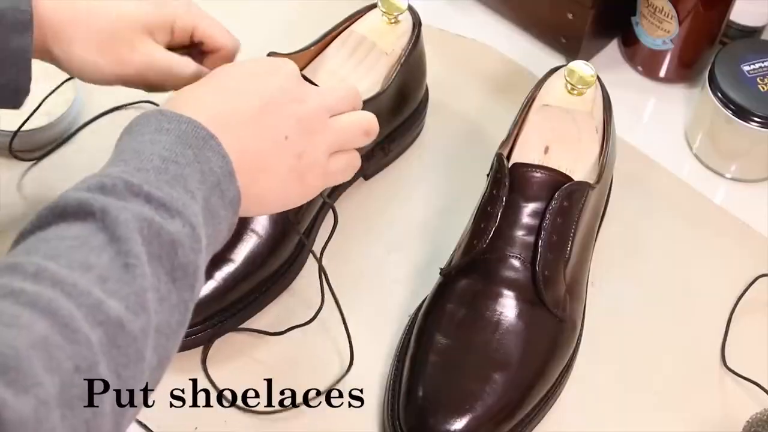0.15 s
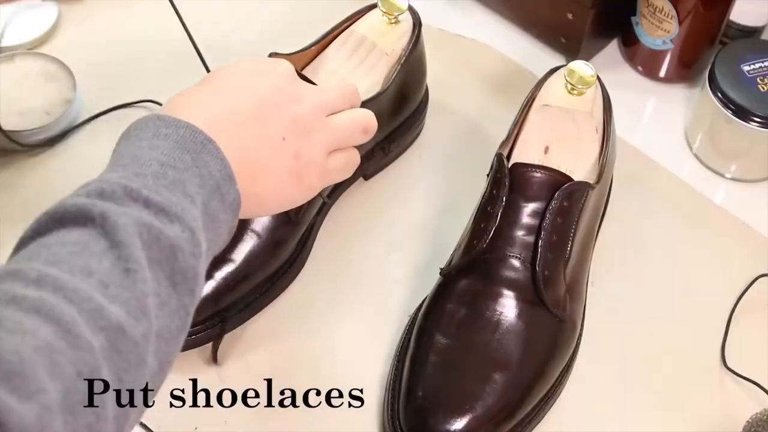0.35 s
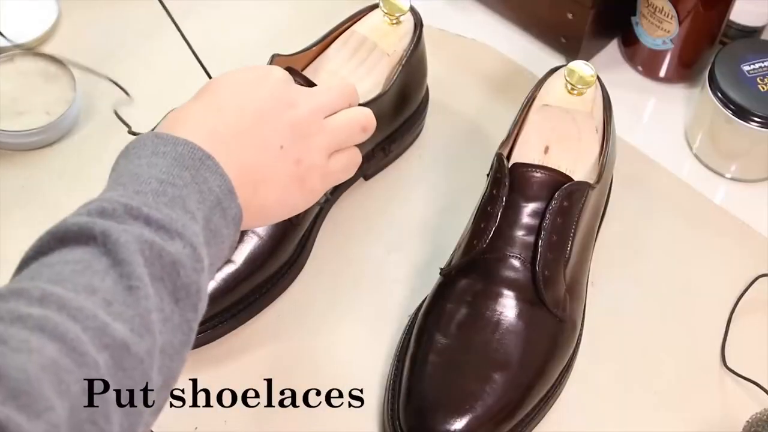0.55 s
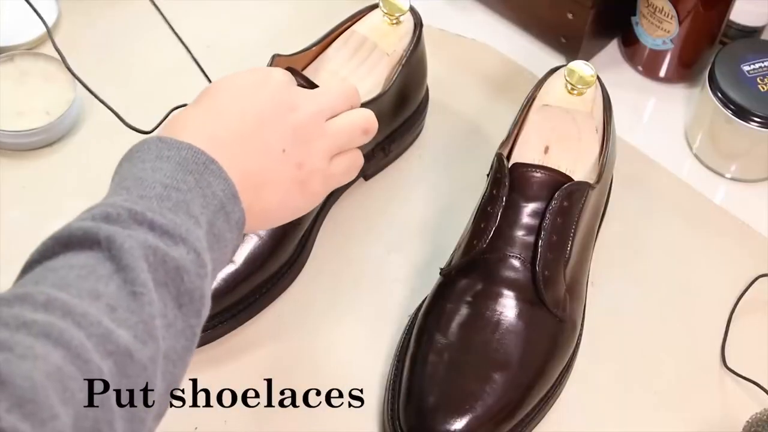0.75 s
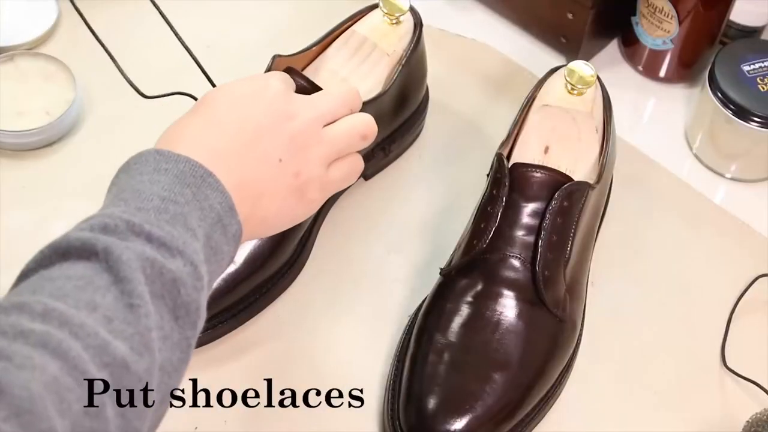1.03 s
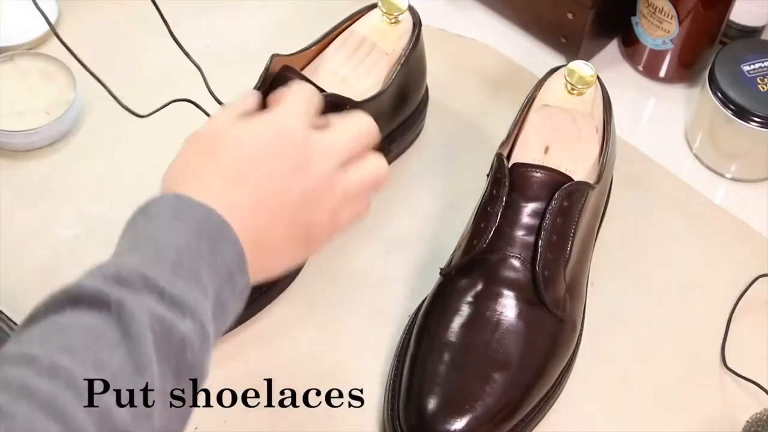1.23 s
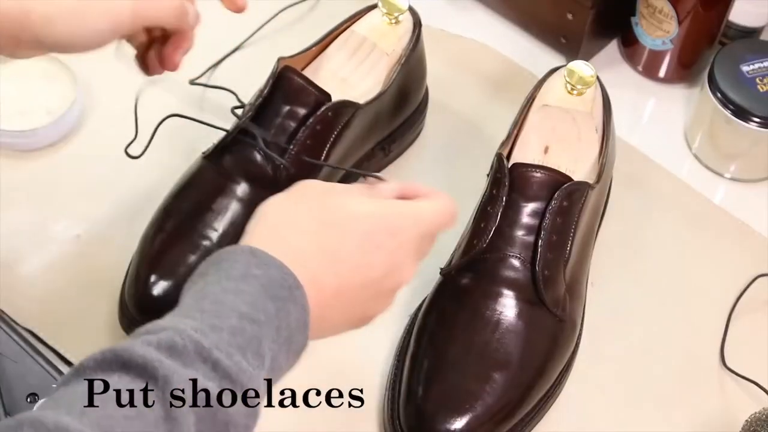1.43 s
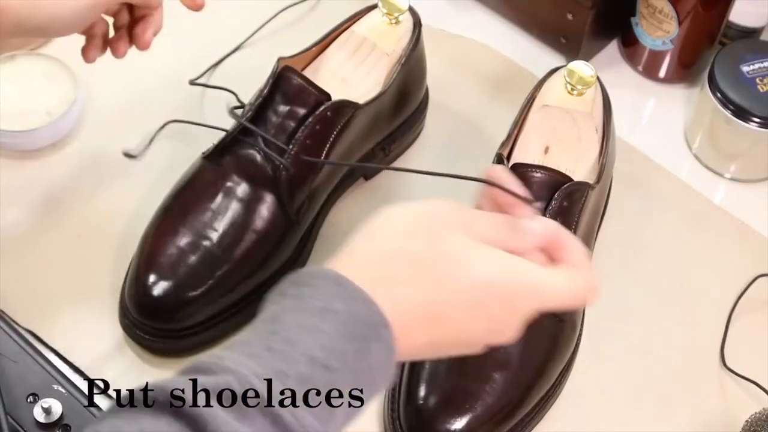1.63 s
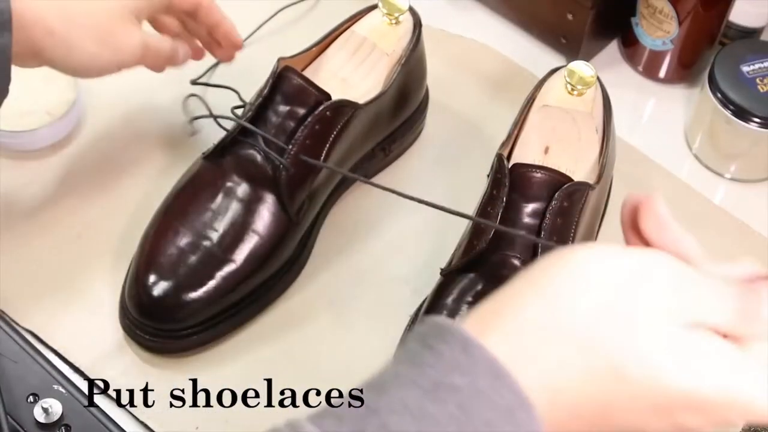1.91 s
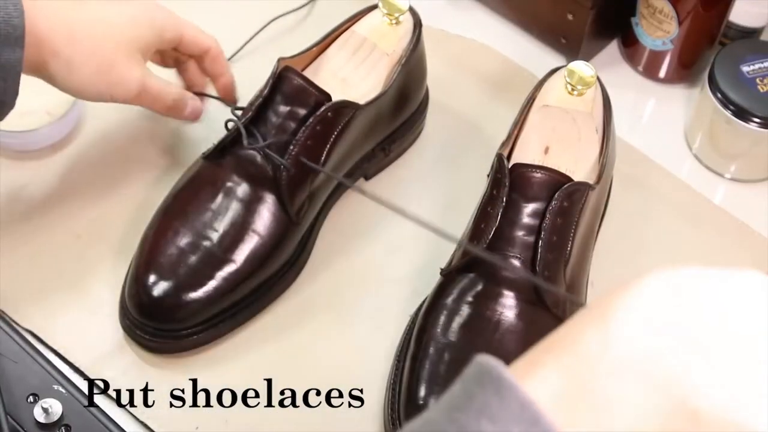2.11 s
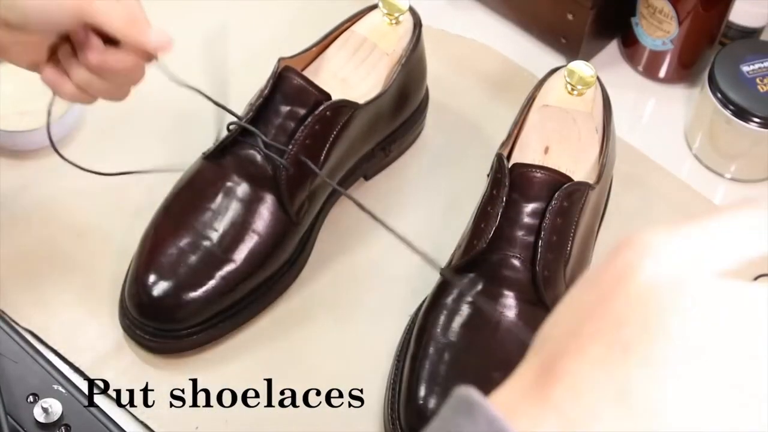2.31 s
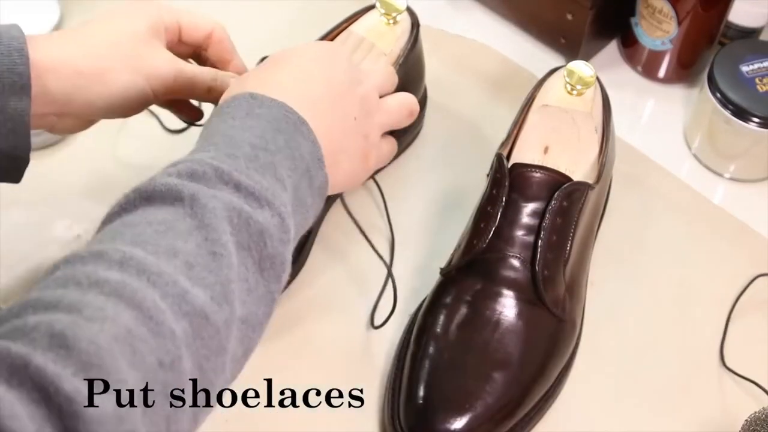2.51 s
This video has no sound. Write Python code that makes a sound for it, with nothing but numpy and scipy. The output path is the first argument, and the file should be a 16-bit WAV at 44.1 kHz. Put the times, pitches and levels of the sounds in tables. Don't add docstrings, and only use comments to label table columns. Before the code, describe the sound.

A shoelace drawn through leather eyelets, close and dry in a quiet small room. A tick at 0.1 s, then a bright hissing, squeaky-rubbing pull from 0.2 to 1.0 s, with knocks near 0.8 and a short hollow moan at 0.9. A small tick at 1.2, a duller, woodier scraping pull from 1.4 to 2.3 with ticks at 1.85 and 2.1, then finger rustle and light clicks until 2.6.

```python
import sys
import numpy as np
from scipy import signal
from scipy.fft import rfft, irfft
from scipy.io import wavfile
from scipy.ndimage import uniform_filter1d

SR = 44100
rng = np.random.default_rng(int(sys.argv[2]) if len(sys.argv) > 2 else 0)


def convert_level_to_amplitude(level_db):
    exponent = np.asarray(level_db, float) / 20
    return 10 ** exponent


def wav_record(signal):
    frames = np.transpose(np.atleast_2d(signal))
    bounded = np.clip(frames, -1, 1)
    quanta = np.round(bounded * 32767).astype(np.int16)
    wavfile.write(sys.argv[1], SR, quanta)


N = 116865


def evened(x):
    return x / np.sqrt(np.mean(x ** 2) + 1e-20)


def read(points, hz):
    f, value = np.transpose(points)
    return np.interp(np.log(hz + 1), np.log(f + 1), value)


def level_over_time(points, t):
    return convert_level_to_amplitude(np.interp(t, *np.transpose(points), left=-120, right=-120))


def smooth_patches(shape, first, second):
    noise = rng.standard_normal(shape)
    return evened(uniform_filter1d(uniform_filter1d(noise, first, 0), second, 1))


def modes(table, hz):
    response = 0
    for k, (f, width, db) in enumerate(table):
        response = response + convert_level_to_amplitude(db) * 1j * (hz / f) / (1 + 2j * (hz - f) / width) * (-1) ** k
    return response


# pitch_hz, density_db (per Hz)
ROOM_TONE = [(25, -26), (70, -11), (200, -6), (420, -8), (1200, -12), (2600, -26), (5000, -30),
             (15500, -36)]
ROOM_TONE_DB = -51


def room_tone():
    frames, hz = N // 256 + 5, np.fft.rfftfreq(1024, 1 / SR)
    a, b, c, d = rng.standard_normal((4, 513, frames))
    patches = smooth_patches((513, frames), 10, 12)
    left = a + 1j * b
    right = .4 * left + .9 * (c + 1j * d)
    colour = convert_level_to_amplitude(read(ROOM_TONE, hz)[:, None] + 1.5 * patches)
    z = np.array([left * convert_level_to_amplitude(2.5), right * convert_level_to_amplitude(-2.5)]) * colour
    return convert_level_to_amplitude(ROOM_TONE_DB + 6.0) * evened(signal.istft(z, nperseg=1024, noverlap=768)[1][:, :N])


# pitch_hz, decay_s
ROOM_DECAY = [(200, 0.31), (2000, 0.15), (10000, 0.085)]


def room(x):
    taps = np.zeros((2, SR // 2))
    at = np.arange(80, SR // 2 - 20, 20) + rng.integers(0, 20, (2, (SR // 2 - 81) // 20))
    np.put_along_axis(taps, at, rng.choice([-1., 1.], at.shape), 1)
    hz, t, z = signal.stft(taps, SR, nperseg=256)
    decay = convert_level_to_amplitude(-60 * t / read(ROOM_DECAY, hz)[:, None])
    tail = signal.istft(z * decay, SR, nperseg=256)[1]
    return signal.fftconvolve(x, tail / np.linalg.norm(tail[0]), axes=1)[:, :N]


# time_s, level_db
MOAN = [(.89, -66), (.905, -20.5), (.93, -20.5), (.958, -25.5), (.975, -30.5), (1.04, -46), (1.1, -60)]
MOAN_HZ, MOAN_SAG_HZ_PER_S, MOAN_ROUGH = 522.6, 60, .6


def moan():
    t = np.arange(N) / SR
    phase_waver, level_waver = (evened(uniform_filter1d(v, 500)) for v in rng.standard_normal((2, N)))
    since = t - MOAN[0][0]
    turn = 2 * np.pi * (MOAN_HZ - MOAN_SAG_HZ_PER_S * since / 2) * since + MOAN_ROUGH * phase_waver
    level = level_over_time(MOAN, t) * (1 + MOAN_ROUGH * level_waver)
    return np.array([np.sin(turn) * convert_level_to_amplitude(1), np.sin(turn + 0.84)]) * level


NEAR_LEFT_DB = 4
# time_s, level_db
RELEASES = [(0.368, -13), (.437, -5), (.466, -12), (.482, -14), (.519, -4), (0.62, -19), (0.699, -15)]
RELEASE_HZ, RELEASE_S = 1373, 0.0034


def releases():
    t, burst = np.arange(N) / SR, 0
    for s, db in RELEASES:
        hz = RELEASE_HZ * rng.uniform(.97, 1.03)
        burst = burst + convert_level_to_amplitude(db) * np.exp(-((t - s) / RELEASE_S) ** 2 + 2j * np.pi * hz * (t - s))
    return np.array([burst.imag * convert_level_to_amplitude(NEAR_LEFT_DB), -burst.real * convert_level_to_amplitude(-NEAR_LEFT_DB)])


# start_s, ring_db, ring_hz, crack_db, crack_hz
TICKS = [(.1233, -13, 1590, -8, 4150), (.766, -2, 1230, -27, 3530), (.7965, -4, 1360, -4, 4060),
         (.8085, -3, 1330, -8, 6500), (.9, -9.5, 1050, -7, 3900), (1.098, -32, 1250, -48, 2100),
         (1.339, -39, 900, -37, 2640), (1.2327, -6.5, 1000, -22.5, 13200), (1.233, -28, 2270, -23.5, 5860),
         (1.8467, -5, 1370, -13, 2650), (2.095, -4, 1600, -10, 2960), (2.151, -35, 2400, -14.5, 3800),
         (2.161, -33, 1360, -27.5, 4300), (2.3, -23, 2040, -19.5, 8400), (2.3006, -63, 2030, -25, 12800),
         (2.3697, -9, 2130, -7.5, 4740), (2.4668, -13.5, 2390, -21, 2520), (2.469, -20.5, 1570, -41, 2920),
         (2.519, -52, 1630, -29.5, 12500), (2.594, -27.5, 1250, -25, 8430)]
# multiple of crack_hz, level_db
CRACK_MODES = [(.87, 0), (1.17, -3), (1.8, -6), (2.4, -6)]
RING_T60, CRACK_T60 = 0.0073, .005
GRIT_DB = -7


def tick_ring(t, db, hz):
    ring = 0
    for multiple, over_db in [(.7, -12.5), (1, 3), (1.45, -4.5)]:
        fade = convert_level_to_amplitude(db + over_db - 60 * t * (multiple * hz / 1300) ** .5 / RING_T60)
        ring = ring + fade * np.sin(2 * np.pi * multiple * hz * t)
    return ring * np.minimum(t / 0.00055, 1)


def tick_crack(t, db, hz, white):
    late = t - np.array([[0], [1 / 4]]) / hz
    snap = 0
    for multiple, over_db in CRACK_MODES:
        if multiple * hz < 16500:
            snap = snap + convert_level_to_amplitude(over_db) * np.sin(2 * np.pi * multiple * hz * late)
    band = signal.butter(2, [hz * .75, min(hz * 1.3, 16500)], "band", fs=SR, output="sos")
    grit = convert_level_to_amplitude(GRIT_DB) * evened(signal.sosfilt(band, white))
    return convert_level_to_amplitude(db - 60 * t / CRACK_T60) * (snap + grit) * np.minimum(t * hz * 2, 1)


def ticks():
    out, t = np.zeros((2, N + 2000)), np.arange(2000) / SR
    for s, ring_db, ring_hz, crack_db, crack_hz in TICKS:
        crack = tick_crack(t, crack_db, crack_hz, rng.standard_normal((2, 2000)))
        tick = tick_ring(t, ring_db, ring_hz) + crack
        out[:, round(s * SR):][:, :2000] += tick * convert_level_to_amplitude([[NEAR_LEFT_DB], [-NEAR_LEFT_DB]])
    return out[:, :N]


def jerks(per_s, spread_db):
    size = convert_level_to_amplitude(spread_db * np.minimum(rng.exponential(1, N), 3.5)) * (rng.random(N) < per_s / SR)
    return evened(size * rng.standard_normal((2, N)))


# pitch_hz, level_db
SIDES = [
    [(60, 11), (180, 1.5), (550, 9), (1650, 6.5), (4970, -0.5), (15000, 14.5)],
    [(60, 1), (240, 0), (950, 7.5), (3770, -4), (15000, 1.5)],
]
# pitch_hz, phase_rad
LEADS = [(300, -1.88), (600, -1.26), (1400, -1.35), (3000, -1.76), (7000, -1.33)]
# pitch_hz, likeness (0 to 1)
ALIKE = [(100, .6), (600, .9), (1400, .78), (4000, .55), (10000, .3)]


def pair(drive, colour, hz, sides):
    a, b = rfft(drive, axis=1)
    alike, half = np.clip(read(ALIKE, hz), 0, 1), convert_level_to_amplitude(read(sides, hz) / 2)
    right = alike * a * np.exp(-1j * read(LEADS, hz)) + np.sqrt(1 - alike ** 2) * b
    colour = colour / np.sqrt(np.mean(abs(colour) ** 2))
    return irfft(np.array([a * half, right / half]) * colour, N)


def wander(x):
    for size, wide, long in [(256, 5, 16), (1024, 2, 9)]:
        z = signal.stft(x, nperseg=size)[2]
        patches = smooth_patches(z.shape[1:], wide, long)
        x = signal.istft(z * convert_level_to_amplitude(1.1 * patches), nperseg=size)[1][:, :N]
    return x


BITE_RISE_S, BITE_FALL_S = 0.0061, 0.0039


def bite_shape(t, start, length):
    rise = np.clip((t - start) / BITE_RISE_S, 0, 1)
    return rise * np.clip(1 - (t - start - length) / BITE_FALL_S, 0, 1) ** 2


# pitch_hz, density_db (per Hz)
HISS = [
    [(1060, -63), (1800, 0.5), (3090, -5), (3670, -2.5), (5650, -11), (7400, -11.5), (15500, -31.5)],
    [(1060, -64), (1800, -5.5), (3150, -10.5), (4120, -3.5), (6350, -11), (9190, -19), (15500, -22)],
    [(1060, -25), (1800, -17), (4050, -16), (5310, -22), (6180, -17.5), (7890, -20.5), (15500, -9.5)],
]
# pitch_hz, width_hz, level_db
EYELET = [
    [(2190, 13, 2.5), (2900, 180, 9), (3470, 1060, 5.5), (5140, 100, 1), (6870, 120, 1), (8850, 140, 6)],
    [(2280, 600, -7.5), (3706, 240, 2.5), (3710, 166, 0), (5260, 110, -6), (6000, 270, -5),
     (7500, 140, -22)],
]
# pitch_hz, width_hz, level_db
UPPER = [
    [(927, 155, -8), (1309, 170, 3.5), (1360, 121, 5), (1580, 113, -4)],
    [(1000, 163, -2), (1268, 217, -1.5), (1378, 118, 3), (1584, 145, -2.5)],
]
# pitch_hz, width_hz, level_db
BODY = [
    [(326, 109, 1.5), (505, 140, 4), (710, 53, 7.5)],
    [(240.2, 19, -10.5), (339, 98, -9), (490, 82, -3), (566, 50.7, 2.5), (706, 50, -2.5)],
]
# pitch_hz, width_hz, level_db
THUMP = [(75, 10.5, 2.3), (148.4, 29.5, 3)]
# upper_db, body_db
STEADY = [
    (-3, -7),
    (2, 5),
    (-9.5, -13.5),
]
TREBLE_DB = [
    -6,
    -17,
    -36,
]
LEVELS = [
    2.67,
    1.69,
    3.02,
]
# time_s, level_db
RIDGE = [(.1, -10), (.4, -20), (.68, -1.5), (.9, -9), (1.4, -12), (1.55, -10), (1.66, -8), (1.78, -4),
         (1.85, -12), (2.12, -12), (2.18, -10.5), (2.3, -19)]
# start_s, length_s, hiss_db
SCRAPES = [(0.767, 0.0081, -22), (.897, 0.028, -31.5), (1.345, .008, -51), (1.406, .045, -43),
           (1.691, 0.022, -27), (1.94, 0.034, -34.5), (2.092, 0.031, -25.5), (2.33, 0.008, -25),
           (2.35, 0.0045, -35), (2.4, .006, -32), (2.425, 0.0034, -39), (2.477, .003, -42)]
SLIPS_PER_S, SLIP_DB, BITES_PER_S, BITE_DB = 12000, 0.5, 2500, 2
FLICKER_DB, FLICKER_S = 1.2, .008
BITE_HISS_DB, THUMP_DB = -15, -32
TREBLE_HZ, BRIGHTEN = 6610, 0.56


def pull(strokes, bites, scrapes, which):
    t, hz, shoe = np.arange(N) / SR, np.fft.rfftfreq(N, 1 / SR), min(which, 1)
    slide_gain, upper_gain, body_gain = convert_level_to_amplitude(LEVELS)

    slide = sum(level_over_time(stroke, t) for stroke in strokes)
    steady_upper_db, steady_body_db = STEADY[which]
    upper_power = (slide * convert_level_to_amplitude(steady_upper_db)) ** 2
    body_power = (slide * convert_level_to_amplitude(steady_body_db)) ** 2
    for start, length, upper_db, body_db in bites:
        power = bite_shape(t, start, length) ** 2
        upper_power += power * convert_level_to_amplitude(upper_db) ** 2
        body_power += power * convert_level_to_amplitude(body_db) ** 2
    upper, body = np.sqrt(upper_power), np.sqrt(body_power)
    snags = sum((bite_shape(t, start, length) * convert_level_to_amplitude(db)) ** 2 for start, length, db in scrapes)
    rub = np.sqrt(slide ** 2 + snags + convert_level_to_amplitude(BITE_HISS_DB) ** 2 * (upper_power + body_power))

    unsteady = uniform_filter1d(rng.standard_normal(N), round(FLICKER_S * SR))
    flicker = convert_level_to_amplitude(FLICKER_DB * evened(unsteady))
    grip = jerks(BITES_PER_S, BITE_DB) * flicker
    deep = jerks(BITES_PER_S, BITE_DB) * flicker
    slips = jerks(SLIPS_PER_S, SLIP_DB) * flicker * rub * slide_gain
    bright_slips = slips * convert_level_to_amplitude(TREBLE_DB[which]) * (rub / rub.max()) ** BRIGHTEN

    treble = 1 / (1 + (TREBLE_HZ / (hz + 1)) ** 4)
    weave = convert_level_to_amplitude(read(HISS[which], hz)) * np.minimum(hz / 1500, 1) ** 1.1
    weave = weave * (1 + modes(EYELET[shoe], hz))
    ridge = convert_level_to_amplitude(np.interp(t, *np.transpose(RIDGE)))
    layers = [(slips, weave * (1 - treble)),
              (bright_slips, weave * treble),
              (grip * upper * upper_gain, modes(UPPER[shoe], hz)),
              ((.5 * grip + 0.46 * deep) * body * body_gain, modes(BODY[shoe], hz)),
              (deep[::-1] * body * body_gain * ridge, modes(BODY[shoe][-1:], hz)),
              (deep * rub ** 0.54 * convert_level_to_amplitude(THUMP_DB), modes(THUMP, hz))]
    return wander(sum(pair(drive, colour, hz, SIDES[which % 2]) for drive, colour in layers))


# time_s, level_db
FINGERS_START = [(2.215, -50), (2.235, -31.5), (2.268, -29.5), (2.278, -44)]
# time_s, level_db
FINGERS = [(2.284, -39.5), (2.315, -31), (2.35, -26), (2.375, -30), (2.42, -35.5), (2.5, -48),
           (2.58, -46.5), (2.598, -42), (2.603, -87)]
# start_s, length_s, upper_db, body_db
FINGER_BITES = [(2.288, 0.012, -50, -26.5), (2.312, 0.0384, -38, -24.5), (2.353, 0.02, -28.5, -30.5),
                (2.611, 0.028, -47, -39)]


def fingers():
    return pull([FINGERS_START, FINGERS], FINGER_BITES, SCRAPES[7:], which=2)


# time_s, level_db
SHIFT = [(1.225, -41), (1.24, -43), (1.275, -39), (1.31, -85)]
# time_s, level_db
SECOND_PULL = [(1.364, -52), (1.392, -32.5), (1.535, -33.5), (1.57, -30.5), (1.83, -32), (1.95, -28),
               (2.03, -29.5), (2.14, -34), (2.262, -35.5), (2.286, -48)]
# start_s, length_s, upper_db, body_db
SECOND_BITES = [(1.235, 0.049, -35, -35.5), (1.332, 0.011, -42, -41), (1.376, 0.079, -27.5, -24),
                (1.418, 0.059, -27, -22), (1.486, 0.038, -27, -25), (1.553, 0.035, -30.5, -27),
                (1.584, 0.052, -28, -25), (1.636, 0.01, -29, -35), (1.662, 0.051, -25, -47),
                (1.7, 0.025, -27, -31), (1.74, 0.015, -43, -38), (1.846, 0.014, -19.5, -22.5),
                (1.933, 0.038, -24.5, -24), (2.054, 0.022, -49, -20.5), (2.082, 0.024, -23, -16.5),
                (2.11, 0.01, -34, -43), (2.159, 0.033, -35, -23.5), (2.195, 0.0091, -45, -26),
                (2.222, 0.016, -49, -23), (2.25, 0.012, -30, -25.5)]


def second_pull():
    return pull([SHIFT, SECOND_PULL], SECOND_BITES, SCRAPES[2:7], which=1)


# time_s, level_db
FIRST_PULL = [(.125, -44), (.165, -47), (.2, -30.5), (.24, -34.5), (.36, -25.5), (.73, -26.5), (.87, -28),
              (.91, -26.5), (.97, -31), (1.08, -56.5)]
# start_s, length_s, upper_db, body_db
FIRST_BITES = [(0.154, 0.078, -48, -38), (0.349, 0.078, -27, -29), (0.425, 0.011, -17.5, -45),
               (0.445, 0.051, -17.5, -37), (0.494, 0.012, -15, -42), (0.506, 0.0065, -22, -38),
               (0.52, 0.017, -16.5, -50), (0.601, 0.027, -21, -40), (0.617, 0.0935, -28, -29.5),
               (0.751, 0.017, -19, -24.5), (0.79, 0.019, -18.5, -22), (0.889, 0.014, -26, -30),
               (0.923, 0.039, -61, -29.5)]


def first_pull():
    return pull([FIRST_PULL], FIRST_BITES, SCRAPES[:2], which=0)


ROOM_DB = -10.5


def scene():
    near = first_pull() + second_pull() + fingers() + ticks() + moan() + releases()
    return near + convert_level_to_amplitude(ROOM_DB) * room(near) + room_tone()


def low_pass(x):
    return signal.sosfilt(signal.butter(12, 16980, fs=SR, output="sos"), x)


LOW_HZ, EDGE_HZ = 50, 15800


def record(dry):
    cut = signal.sosfilt(signal.butter(2, LOW_HZ, "high", fs=SR, output="sos"), dry)
    edge = signal.firwin(511, EDGE_HZ, window=("kaiser", 7), fs=SR)[None]
    mix = signal.oaconvolve(np.tanh(cut), edge, "same")
    return low_pass(mix)


dry = scene()
out = record(dry)
wav_record(out)
```